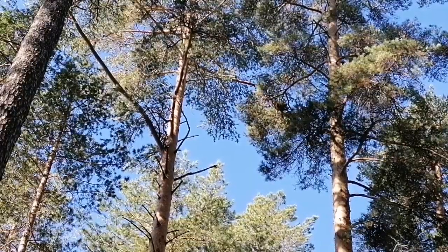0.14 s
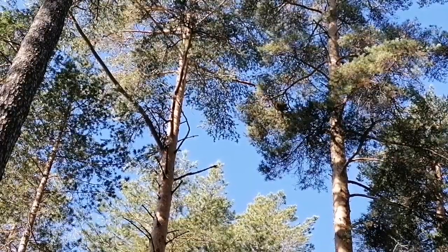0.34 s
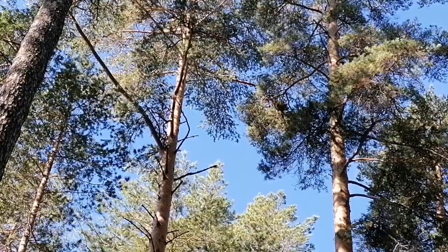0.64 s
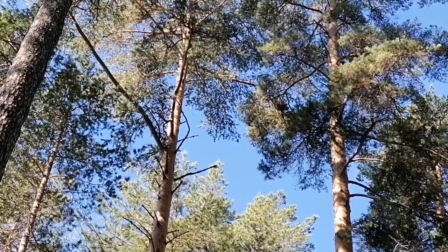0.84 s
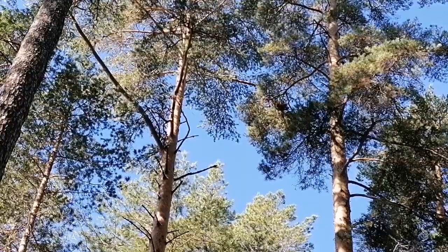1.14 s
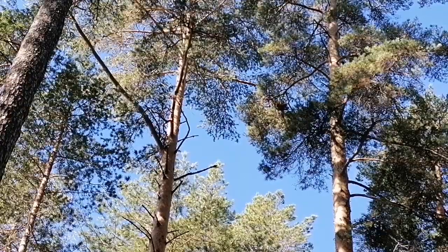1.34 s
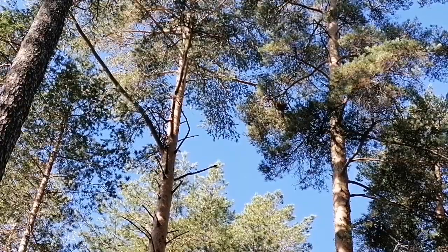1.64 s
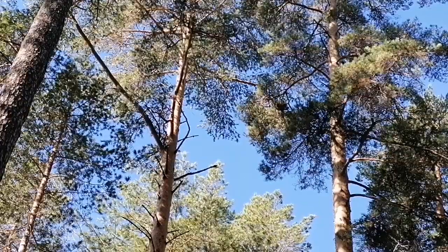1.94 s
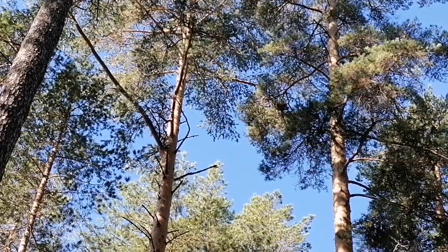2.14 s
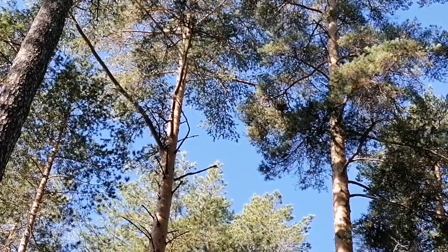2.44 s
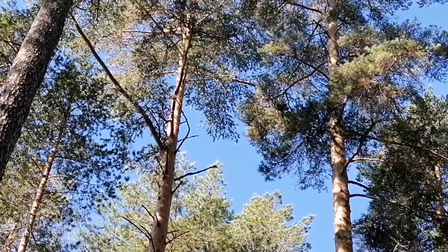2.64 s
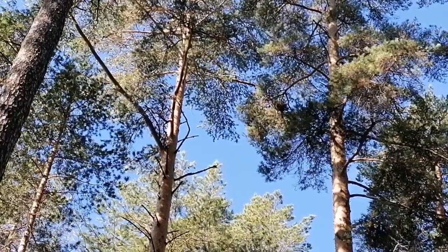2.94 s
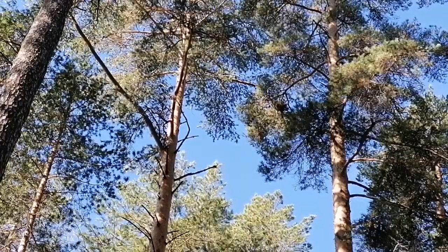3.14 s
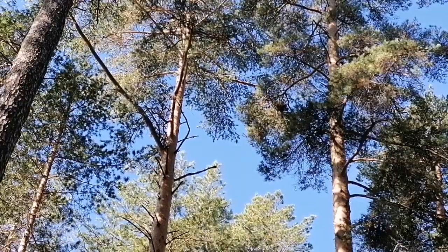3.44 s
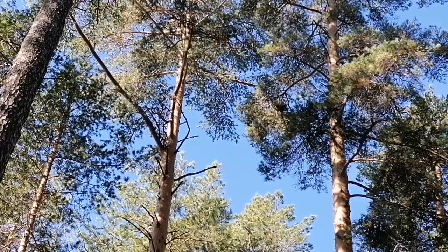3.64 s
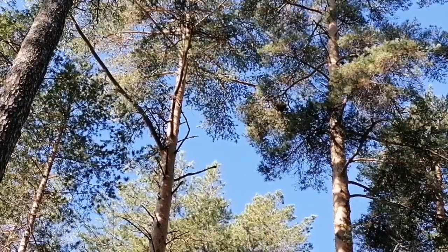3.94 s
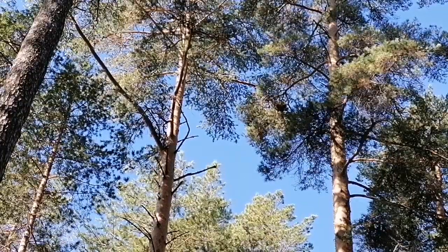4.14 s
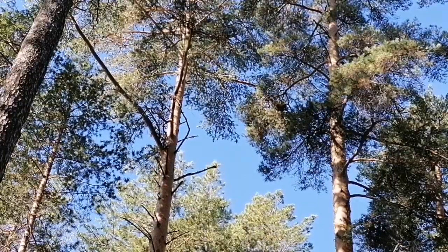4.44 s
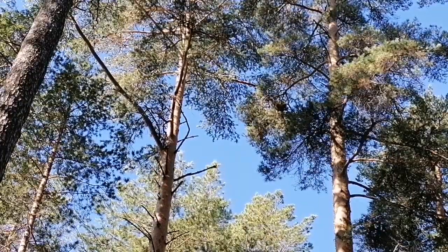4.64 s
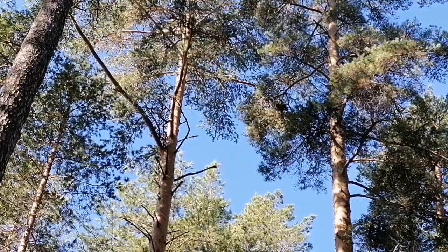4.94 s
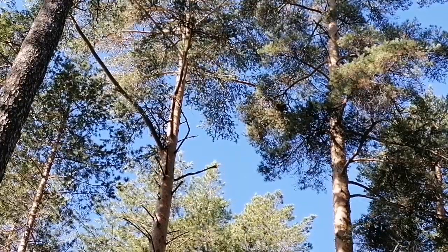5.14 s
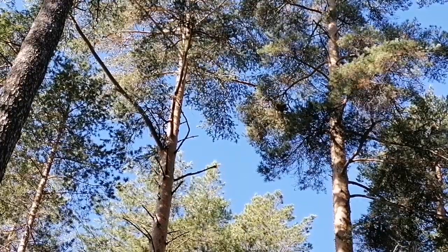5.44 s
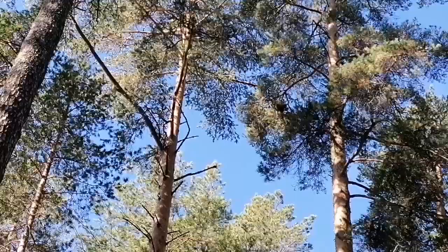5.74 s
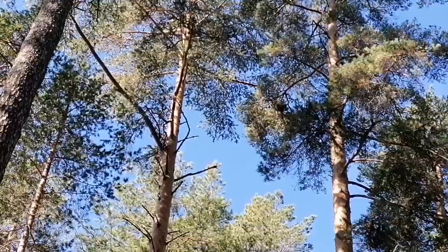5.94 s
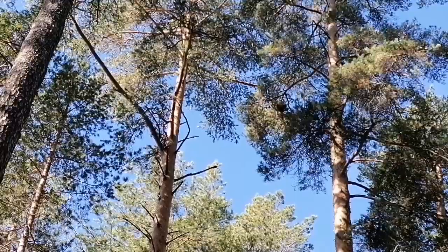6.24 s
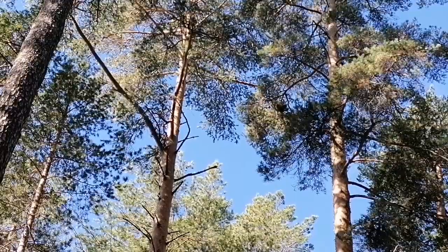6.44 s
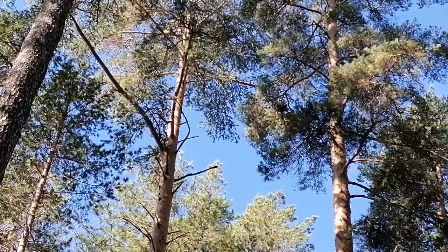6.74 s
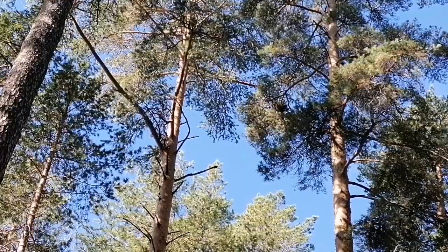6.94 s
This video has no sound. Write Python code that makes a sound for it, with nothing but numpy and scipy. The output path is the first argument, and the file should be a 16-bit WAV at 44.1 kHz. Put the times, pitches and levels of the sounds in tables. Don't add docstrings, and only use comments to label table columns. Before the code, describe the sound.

Stereo forest birdsong over a soft deep roar, faint air hiss and a blurred far chorus. A finch sings a falling whistled phrase ending in rattled flourishes, then starts it again more to the left. Between and over this, a close bird twice gives piercing double-toned notes and a rough buzz climbing to a clear whistle. Small birds add thin high glides and little upward hooks; every note trails woodland echoes.

```python
import sys
import numpy as np
from scipy import signal
from scipy.io import wavfile
from scipy.ndimage import uniform_filter1d

SR = 44100
rng = np.random.default_rng(int(sys.argv[2]) if len(sys.argv) > 2 else 0)


def level_to_linear(level):
    exponent = np.asarray(level, float) / 20
    return 10 ** exponent


def materialize(psi):
    bounded = np.clip(np.atleast_2d(psi).T, -1, 1)
    quanta = np.round(bounded * 32767).astype(np.int16)
    wavfile.write(sys.argv[1], SR, quanta)


N = 312669


def evened(x):
    return x / np.sqrt(np.mean(x ** 2) + 1e-20)


def read(points, hz):
    f, value = np.transpose(points)
    return np.interp(np.log(hz + 1), np.log(f + 1), value)


def over_time(points, t):
    return np.interp(t, *np.transpose(points))


def unfold(rows):
    s, *columns = np.transpose(sorted(rows))
    t = np.arange(s[0], s[-1], 1 / SR)
    return (t, *(np.interp(t, s, column) for column in columns))


def phase(hz):
    return 2 * np.pi * np.cumsum(hz) / SR


def wobble(size, span):
    rough = rng.standard_normal(size + 2 * span)
    smooth = signal.convolve(rough, np.hanning(2 * span), "valid")[:size]
    return smooth / np.sqrt(.75 * span)


def add(mix, t, sound, balance_db, edge_s=.005):
    to_end = np.minimum(t - t[0], t[-1] - t)
    fade = np.sin(np.pi / 2 * np.clip(to_end / edge_s, 0, 1)) ** 2
    sides = level_to_linear(np.outer([.5, -.5], balance_db * np.ones(len(t))))
    part = mix[:, round(t[0] * SR):][:, :len(t)]
    part += (np.sqrt(2) * sound * fade * sides)[:, :part.shape[1]]


def repeated(shape, events):
    return [[(s + dt, hz * share, db + rel_db) for dt, share, rel_db in shape] for s, hz, db in events]


def glides(events, peak_at, start_db, end_db):
    notes = []
    for s, size, first_hz, last_hz, db in events:
        peak_hz = first_hz + peak_at * (last_hz - first_hz)
        notes.append([(s, first_hz, db + start_db), (s + peak_at * size, peak_hz, db),
                      (s + size, last_hz, db + end_db)])
    return notes


def hush(colour, likeness, patchy_db):
    # (f/Hz, likeness)
    same_sides = [(40, 0.91), (130, 0.8), (300.5, 1), (700, 0.22), (1500, 0.28), (4000, 0.085)]
    lead_s = 17 / 44100
    frames, hz = N // 256 + 5, np.fft.rfftfreq(1024, 1 / SR)
    a, b, c, d, patches = rng.standard_normal((frames, 513, 5)).T
    patches = evened(uniform_filter1d(uniform_filter1d(patches, 8, 0), 10, 1))
    same = (likeness * read(same_sides, hz))[:, None]
    left = a + 1j * b
    late_left = left * np.exp(-2j * np.pi * hz * lead_s)[:, None]
    right = same * late_left + np.sqrt(1 - same ** 2) * (c + 1j * d)
    spectrum = np.array([left, right]) * level_to_linear(read(colour, hz)[:, None] + patchy_db * patches)
    return evened(signal.istft(spectrum, nperseg=1024, noverlap=768)[1][:, :N])


def distant_roar():
    # (t/s, roar/dB, rumble/dB)
    levels = [(0.0, -37.5, -35.5), (6.36, -42.5, -40.5), (7.09, -41, -39)]
    # (f/Hz, level/dB)
    colour = [(20, -36), (40, -17.5), (62, -1.5), (100, -22), (160, -21.5), (300, -16), (600, -15),
              (1000, -20), (1500, -26.5), (2500, -35), (4000, -58.5)]
    s, roar_db, rumble_db = np.transpose(levels)
    t = np.arange(N) / SR
    whole = hush(colour, likeness=.99, patchy_db=.96)
    rumble = signal.sosfiltfilt(signal.butter(2, 130, fs=SR, output="sos"), whole)
    roar = evened(whole - rumble) * level_to_linear(np.interp(t, s, roar_db))
    return roar + evened(rumble) * level_to_linear(np.interp(t, s, rumble_db))


def far_chorus():
    # (t/s, level/dB)
    levels = [(0, -51), (.5, -49.5), (.9, -64), (1.1, -41), (2.3, -43.5), (3.1, -50.5), (3.55, -41),
              (3.9, -50), (4.3, -54), (5.2, -49), (5.4, -78), (5.6, -45), (5.75, -37.5), (5.95, -34),
              (6.2, -39), (6.35, -45), (6.75, -35), (7.09, -43)]
    # (f/Hz, level/dB)
    colour = [(1900, -33.5), (2500, -7.5), (3000, 4.5), (3600, 5.5), (4100, 1.5), (4600, -19),
              (5800, -18.5), (7000, -20.5), (8500, -55)]
    return hush(colour, likeness=.8, patchy_db=2) * level_to_linear(over_time(levels, np.arange(N) / SR))


def air_hiss():
    # (f/Hz, level/dB)
    colour = [(1500, -16.5), (2500, -4), (4500, -11.5), (6500, -15), (8000, -21), (10000, -24),
              (13000, -32.5), (15400, -42)]
    return hush(colour, likeness=.66, patchy_db=3) * level_to_linear(-52.5)


def woods(dry, lead, wet_db, first_db):
    # (f/Hz, time/s)
    fading = [(1500, 0.9), (3000, 0.36), (5000, 0.46), (8000, 0.37), (12000, 0.36)]
    taps = np.zeros((2, SR))
    at = np.arange(300, SR - 20, 20) + rng.integers(0, 20, (2, (SR - 301) // 20))
    np.put_along_axis(taps, at, rng.choice([-1., 1.], at.shape), 1)
    hz, t, z = signal.stft(taps, SR, nperseg=256)
    z *= level_to_linear(-60 * t / read(fading, hz)[:, None]) * (1 - np.exp(-t / .019))
    tail = signal.istft(z, SR, nperseg=256)[1]
    tail *= level_to_linear(wet_db) / np.linalg.norm(tail[0])
    first_echoes = level_to_linear(first_db) * rng.uniform(-1, 1, (2, 4))
    np.put_along_axis(tail, rng.integers(40, 900, (2, 4)), first_echoes, 1)
    direct = np.array([dry[0], np.roll(dry[1], lead)])
    return direct + signal.fftconvolve(dry.mean(0)[None], tail, axes=1)[:, :N]


def whistles(notes, balances_db, octave_db, third_db, flutter_db, tremble=0, steady_hz=4900):
    mix = np.zeros((2, N))
    for rows, balance_db in zip(notes, balances_db * np.ones(len(notes))):
        t, hz, db = unfold(rows)
        shake = .005 + tremble * np.clip((hz - steady_hz) / 700, 0, 1)
        turn = phase(hz * (1 + shake * wobble(len(t), span=100)))
        tone = np.sin(turn) + level_to_linear(octave_db) * np.sin(2 * turn) + level_to_linear(third_db) * np.sin(3 * turn)
        add(mix, t, tone * level_to_linear(db + flutter_db * wobble(len(t), span=200)), balance_db)
    return mix


def reed():
    # (t/s, level/dB)
    levels = [(.61, -47), (.7, -57), (.8, -67), (.95, -42.5), (1.05, -68), (1.2, -73)]
    # (multiple of the root, level/dB, end/s)
    overtones = [(2, -59.5, 0.99), (3, -64.5, 0.92), (7, -62.5, 0.99), (8, -74, 0.9)]
    mix = np.zeros((2, N))
    t, db = unfold(levels)
    turn = phase(1364 * (1 + .0017 * wobble(len(t), span=900)))
    tone = level_to_linear(db) * np.sin(turn)
    for k, over_db, end in overtones:
        tone += level_to_linear(over_db) * np.sin(k * turn) * np.clip((end - t) / .03, 0, 1)
    add(mix, t, tone, .3, edge_s=.019)
    return mix


def thin_notes():
    # (start t/s, length/s, from f/Hz, to f/Hz, peak level/dB)
    ahead = [ (.19, .09, 7078, 7530, -68), (.28, 0.14, 7530, 7000, -65), (.91, 0.15, 7000, 7800, -61),
             (1.47, 0.082, 7700, 6800, -59), (1.55, 0.16, 7450, 7200, -53), (2.13, 0.046, 7000, 7432, -64),
             (2.64, 0.24, 7490, 7460, -58), (2.82, 0.26, 7200, 6970, -51.5), (3.4, .03, 7240, 7200, -57),
             (3.64, .03, 9329, 7200, -68), (3.67, .05, 7270, 7170, -53)]
    # (start t/s, length/s, from f/Hz, to f/Hz, peak level/dB)
    right = [
        (3.76, .14, 8100, 6990, -54.5),
        (5.36, 0.18, 8200, 7270, -55),
    ]
    trill = [(5.748 + k * .057, .025, 7400, 6750, -53) for k in range(4)]
    ahead_notes = glides(ahead + trill, peak_at=.45, start_db=-5, end_db=-11)
    right_notes = glides(right, peak_at=.7, start_db=-19, end_db=-6.5)
    mix = whistles(ahead_notes, 1.5, -46, -49, 2.5)
    return mix + whistles(right_notes, -14.5, -46, -49, 2.5)


def rising_hooks():
    # (start t/s, top f/Hz, level/dB)
    hooks = [
        (4.43, 4290, -37),
        (4.64, 4240, -33.5),
    ]
    balances = [-16, -8]
    # (t/s after start, share of top pitch, level/dB against the hook)
    hook = [(0, .7, -9), (.015, .85, -13), (.028, 0.972, -2.5), (.04, 1.001, -3.5), (.062, .995, -8)]
    return whistles(repeated(hook, hooks), balances, -47, -48, 1.5)


def warbler():
    # (start t/s, drop/s, held f/Hz, level/dB)
    drops = [ (3.22, 0.057, 4980, -54.5), (3.35, .06, 5040, -59), (3.51, 0.043, 4970, -54),
             (3.77, .025, 5460, -63), (3.911, .025, 5040, -37), (5.21, 0.04, 4800, -51),
             (4.291, .045, 5020, -38)]
    balances = [-12, -11, 9, -20, 4, 6, 0]
    notes = []
    for s, drop, hz, db in drops:
        notes.append([(s, hz * 1.18, db - 9), (s + drop, hz, db - 5), (s + drop + .025, hz, db),
                      (s + drop + .105, hz * .99, db - 21)])
    return whistles(notes, balances, -44, -49, 2.5, tremble=.02, steady_hz=4540)


def rattles(strokes, edge_db, rate_hz=110, swing=.073):
    mix = np.zeros((2, N))
    for rows in strokes:
        t, hz, db = unfold(rows)
        chop = phase(rate_hz * (1 + .255 * wobble(len(t), span=300)))
        now_hz = hz * (1 + swing * np.sin(chop))
        turn = phase(now_hz)
        edge = sum(np.exp(-((k * now_hz - 11900) / 1900) ** 2) * np.sin(k * turn) for k in (2, 3))
        tone = np.sin(turn) + level_to_linear(edge_db) * edge
        add(mix, t, tone * level_to_linear(db) * (1 - .83 * np.cos(chop)), .8)
    return mix


def finch_flourish():
    # (t/s, f/Hz, level/dB)
    dive = [(2.587, 6180, -47.5), (2.63, 5430, -34), (2.66, 4626, -33.5), (2.7, 3554, -32),
            (2.76, 2710, -35), (2.82, 2373, -38), (2.88, 2155, -44.5)]
    # (t/s, f/Hz, level/dB)
    recovery = [(2.87, 2995, -42), (2.96, 3496, -39.5), (3.06, 3900, -58)]
    # (t/s, f/Hz, level/dB)
    tag = [(2.965, 4520, -39.5), (2.995, 4620, -52)]
    # (start t/s, top f/Hz, level/dB)
    strokes = [(2.257, 7450, -38.5), (2.335, 7126, -34), (6.833, 7000, -51), (6.963, 7130, -40.5),
               (7.04, 7230, -38.5)]
    # (t/s after start, share of top pitch, level/dB against the stroke)
    stroke = [(0, .64, -11), (.009, .97, -6), (.024, .76, 2), (.04, 0.62, -6.5), (.085, 0.86, -12)]
    leaps = repeated(stroke, strokes) + [recovery, tag]
    return rattles([dive], -25.5) + rattles(leaps, -37, rate_hz=130, swing=.11)


def pips():
    # (start t/s, level/dB)
    starts = [(1.7906, -50), (1.838, -39), (1.856, -31.5), (1.9001, -44), (1.9295, -60), (1.982, -30),
              (2.0258, -38), (2.0552, -53), (2.0822, -59), (2.1196, -33), (2.129, -39), (2.164, -41),
              (2.2294, -51)]
    notes = []
    for s, db in starts:
        hz = 4360 - 350 * (s - starts[0][0])
        notes.append([(s, hz, db + 5.5), (s + .014, hz, db)])
    return whistles(notes, .3, -63, -43, .94)


def sweeps():
    # (start t/s, length/s, from f/Hz, to f/Hz, peak level/dB)
    swept = [ (1.415, 0.027, 3420, 2650, -29.5), (1.53, 0.0318, 3420, 2550, -30.5),
             (1.637, 0.045, 3420, 2480, -32), (1.857, 0.0324, 3370, 2700, -30),
             (2.5, .032, 2800, 2750, -37), (1.735, .065, 4050, 2500, -23.5), (1.876, .064, 4050, 2350, -24),
             (2.008, .062, 4030, 1990, -25), (2.143, .064, 4020, 1900, -25),
             (6.715, .06, 3950, 2280, -31.5), (6.855, .06, 3750, 2100, -32.5),
             (5.235, .035, 2000, 2460, -62), (6.69, .02, 5300, 4300, -39.5),
             (6.915, 0.026, 5030, 4470, -45), (6.895, 0.022, 3880, 5030, -34.5)]
    # (t/s, f/Hz, level/dB)
    upsweep = [(2.43, 1794, -46), (2.465, 2153, -36.5), (2.495, 2785, -27), (2.512, 3197, -27.5)]
    notes = glides(swept, peak_at=.49, start_db=-.5, end_db=-10) + [upsweep]
    return whistles(notes, -.3, -53, -49, 2.5)


def syllables(rows, flick, pip, slur):
    small = [(s, hz, small_db) for s, hz, _, small_db in rows]
    slurred = [(s, hz, slur_db) for s, hz, slur_db, _ in rows]
    return repeated(flick, small) + repeated(pip, small) + repeated(slur, slurred)


def finch_phrases():
    # (start t/s, slur f/Hz, slur level/dB, flick and pip level/dB)
    first = [ (.755, 4580, -35.5, -40.5), (.945, 4494, -25.5, -36), (1.14, 4389, -23.5, -28.5),
             (1.335, 4300, -24, -31), (1.525, 4390, -23, -31) ]
    again = [ (5.445, 4660, -40, -64), (5.636, 4440, -32, -36), (5.83, 4385, -27, -29),
             (6.023, 4466, -29, -24.5), (6.215, 4370, -39.5, -27.5) ]
    # (t/s after start, share of slur pitch, level/dB against the part's level)
    flick = [(0, 1.2, -14), (0.024, 1.33, -2)]
    pip = [(.024, 1.09, 0.5), (.045, 1.1, -9)]
    slur = [(.05, 1.35, -5), (.065, 1.13, -19.5), (.085, 1.04, -8.5), (.115, .995, 1),
            (0.166, 1.005, -17.5)]
    later_flick = [(.001, 1.2, -16), (.022, 1.3, -10)]
    later_pip = [(0.021, 0.992, -1.5), (0.028, 1.133, 8)]
    later_slur = [(0.086, 1.06, -15.5), (.11, 0.98, 1.5), (.14, .96, -8)]
    mix = whistles(syllables(first, flick, pip, slur), .3, -32, -39.5, 2.5, tremble=.06)
    later = syllables(again, later_flick, later_pip, later_slur)
    return mix + whistles(later, 7.2, -33, -53.5, 2.5, tremble=.051, steady_hz=4190)


def duet_levels(s, size, up_db, low_db, dip_db):
    before, deepest, after = s + size * np.array((.4, .6, .82))
    return [(s, up_db - 16, low_db - 30), (s + .02, up_db, low_db),
            (before, up_db + dip_db / 2, low_db), (deepest, up_db + dip_db, low_db - 2.5),
            (after, up_db, low_db - 2.5), (s + size, up_db - 5, low_db - 5)]


def duets():
    # (start t/s, length/s, upper level/dB, lower level/dB, midway dip/dB)
    notes = [(4.276, .18, -22, -34.5, -0.5), (4.574, 0.084, -15.5, -30.5, -10),
             (5.965, 0.16, -17.5, -26.5, -10.5), (6.239, .085, -20, -30, -1.5)]
    # (upper f/Hz, lower f/Hz, upper balance/dB, lower balance/dB, lower octave/dB)
    voices = [(7877, 5474, -9, 9, -13), (7417, 5308, -0.5, -9, -21.5), (7870, 5425, 6.5, -7, -11),
              (7442, 5282, 9, 14.5, -9.5)]
    # (upper multiple, lower multiple, level/dB against the mean of both voices)
    mixing = [
        (1, 1, -31),
        (2, -1, -29.5),
        (-1, 3, -29.5),
        (2, 0, -28),
    ]
    mix = np.zeros((2, N))
    for note, (up_hz, low_hz, up_balance, low_balance, octave_db) in zip(notes, voices):
        t, up_db, low_db = unfold(duet_levels(*note))
        start = .021 * np.exp(-(t - t[0]) / .015)
        drift = 1 + .0014 * wobble(len(t), span=700)
        up, low = phase(up_hz * (drift - start)), phase(low_hz * (drift + start))
        mean_db = (up_db + low_db) / 2
        mixed = sum(level_to_linear(mean_db + db) * np.sin(a * up + b * low) for a, b, db in mixing)
        add(mix, t, level_to_linear(up_db) * np.sin(up) + mixed, up_balance)
        add(mix, t, level_to_linear(low_db + octave_db) * np.sin(2 * low), -8.5)
        add(mix, t, level_to_linear(low_db) * np.sin(low), low_balance)
    return mix


def buzz_course(note, balances):
    # (t/s after its start, f/Hz, share of the way to the whistle)
    climbing = [(-.045, 2730, 0), (.008, 2790, 0.17), (.02, 3380, 0.64), (.031, 3900, 0.9),
                (.048, 4040, .97)]
    s, climb, end, buzz_db, top_db = note
    buzz_balance, top_balance = balances
    low_db = buzz_db - 1
    rows = [(s, 2940, buzz_db + 7, buzz_balance / 2), (s + .0334, 2764, buzz_db, buzz_balance)]
    for dt, hz, way in climbing:
        db = low_db + way * (top_db - low_db)
        rows.append((climb + dt, hz, db, buzz_balance + way * (top_balance - buzz_balance)))
    return rows + [(end, 4106, top_db - 7.5, top_balance)]


def buzzes():
    # (start t/s, climb t/s, end t/s, buzz level/dB, whistle level/dB)
    notes = [
        (4.711, 4.931, 5.02, -40.5, -17.5),
        (6.376, 6.603, 6.722, -34.5, -14.5),
    ]
    # (buzz/dB, whistle/dB)
    balances = [
        (8, 12.5),
        (7.5, -22.5),
    ]
    # (t/s, f/Hz)
    warble_speed = [(4.7, 180), (4.95, 155), (6.37, 180), (6.63, 176)]
    # (pitch f/Hz, swing/Hz, octave/dB)
    calming = [(2950, 310, 7), (3350, 380, -24), (3900, 260, -42), (4060, 50, -52), (4090, 3, -54)]
    throat_hz, beak_hz = 4300, 9600
    mix = np.zeros((2, N))
    pitch, swings, octaves = np.transpose(calming)
    for note, sides in zip(notes, balances):
        t, hz, db, balance_db = unfold(buzz_course(note, sides))
        cap_db = -7.5 - abs(balance_db) / 2
        swing_hz, octave_db = np.interp(hz, pitch, swings), np.interp(hz, pitch, octaves)
        warble = phase(over_time(warble_speed, t) * (1 + .05 * wobble(len(t), span=300)))
        now_hz = hz + swing_hz * (np.sin(warble) + .1 * wobble(len(t), span=120))
        turn = phase(now_hz)
        bend_db = 40 * np.log(now_hz / hz)
        pulls = throat_hz, throat_hz, beak_hz, beak_hz
        levels = 0, octave_db, octave_db - 31, octave_db - 46
        tone = 0
        for k, over_db, pull in zip(range(1, 5), levels, pulls):
            tone = tone + level_to_linear(over_db + bend_db * np.tanh((pull - k * hz) / 600)) * np.sin(k * turn)
        rough_db = 2.5 * swing_hz / swings[0] * wobble(len(t), span=120)
        add(mix, t, tone * level_to_linear(np.minimum(db + rough_db, cap_db)), balance_db, edge_s=.0027)
    return mix


def scene():
    background = distant_roar() + far_chorus() + air_hiss()
    small_birds = reed() + thin_notes() + rising_hooks() + warbler()
    finch = pips() + sweeps() + finch_phrases()
    far = woods(small_birds, lead=0, wet_db=-4, first_db=-11)
    left = woods(finch_flourish(), lead=17, wet_db=0, first_db=-8)
    left += woods(finch, lead=17, wet_db=-3, first_db=-12)
    near = woods(duets() + buzzes(), lead=4, wet_db=-15, first_db=-20)
    return background + far + left + near


def band_limit(x):
    return signal.sosfilt(signal.butter(12, 15630, fs=SR, output="sos"), x)


def record(dry):
    offset = -.0018
    return band_limit(dry + offset)


dry = scene()
out = record(dry)
materialize(out)
```